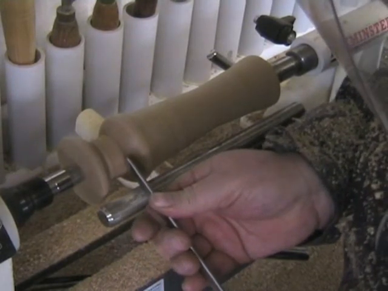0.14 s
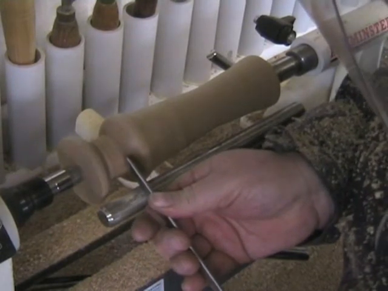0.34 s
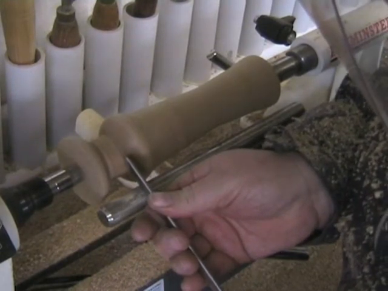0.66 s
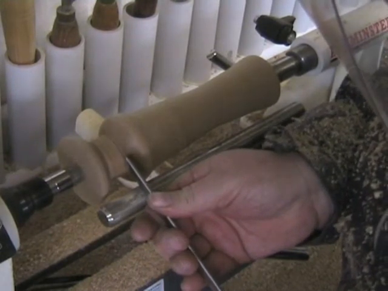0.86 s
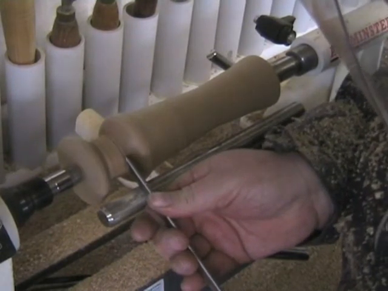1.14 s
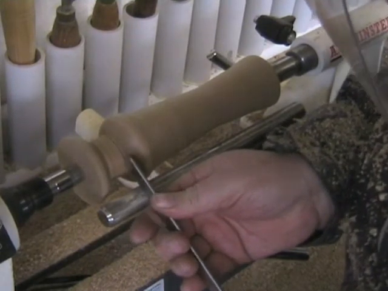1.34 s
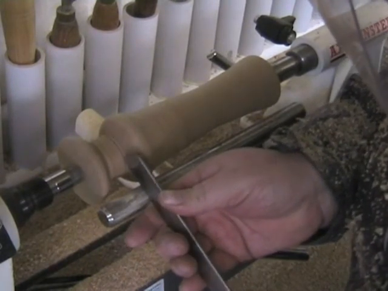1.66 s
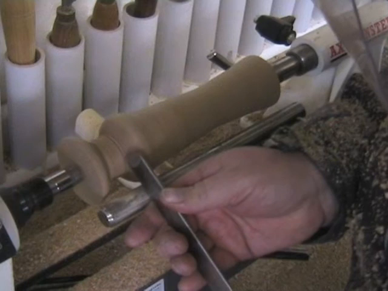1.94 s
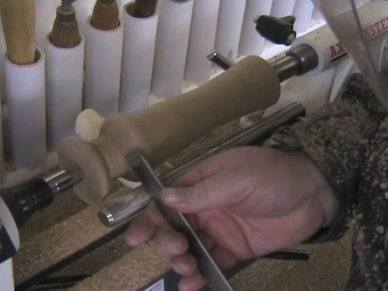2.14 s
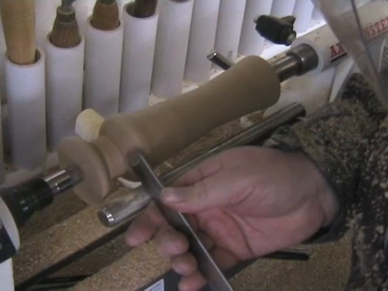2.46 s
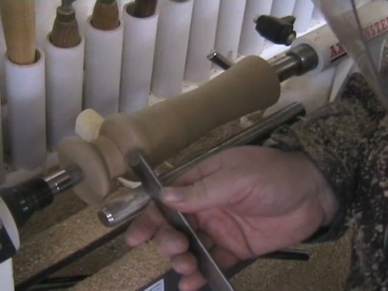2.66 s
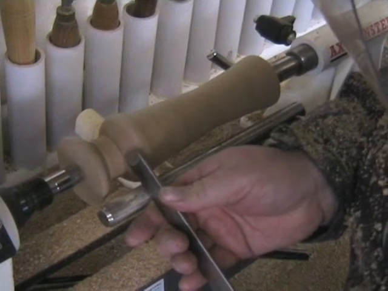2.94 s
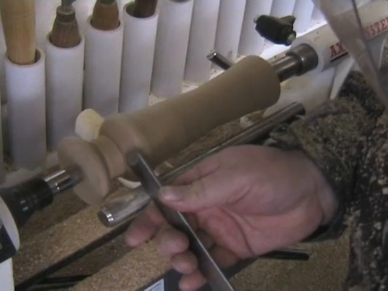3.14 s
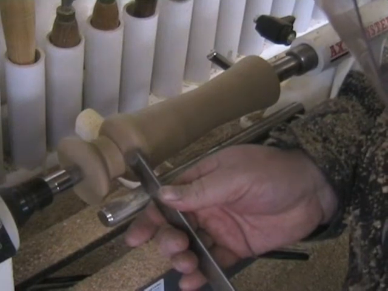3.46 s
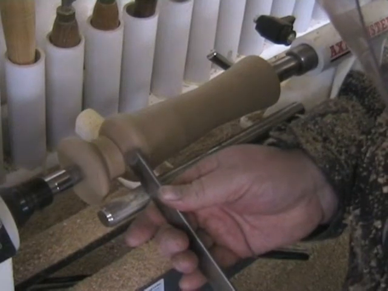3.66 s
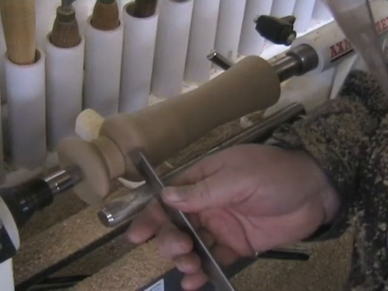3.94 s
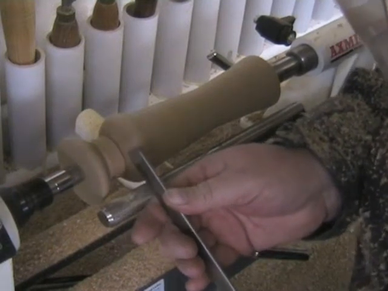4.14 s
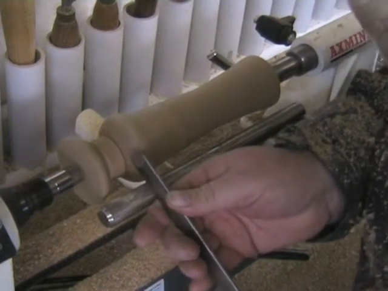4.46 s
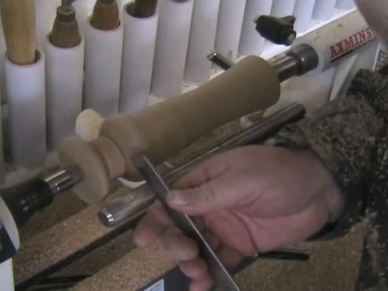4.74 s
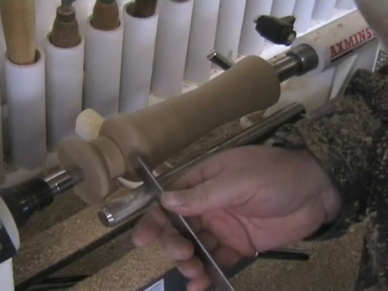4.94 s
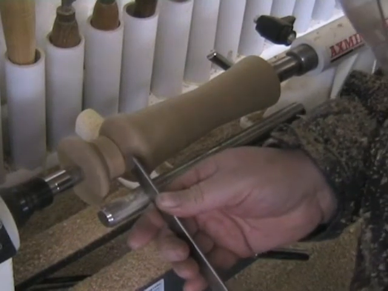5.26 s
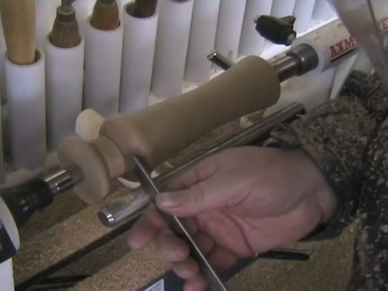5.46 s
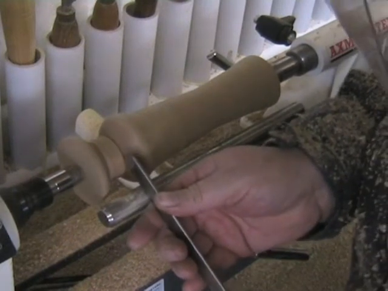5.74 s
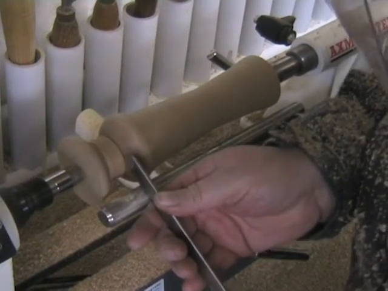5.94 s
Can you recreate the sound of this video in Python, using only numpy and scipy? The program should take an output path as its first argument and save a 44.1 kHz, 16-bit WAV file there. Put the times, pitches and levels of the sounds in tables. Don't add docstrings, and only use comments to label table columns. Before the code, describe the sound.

Steady motor whine and bearing rattle, overlaid by two harsh buzzing scrapes of blade on spinning wood, separated by one short hollow knock.

```python
import sys
import numpy as np
from scipy import signal
from scipy.fft import rfft, irfft, next_fast_len
from scipy.io import wavfile
from scipy.ndimage import uniform_filter1d, map_coordinates

SR = 44100
rng = np.random.default_rng(int(sys.argv[2]) if len(sys.argv) > 2 else 0)


def pcm_store(signal):
    levels = np.round(np.clip(np.atleast_2d(signal), -1, 1) * 32767)
    wavfile.write(sys.argv[1], SR, levels.astype(np.int16).T)


def undo_db(level):
    steps = np.asarray(level, float) / 20
    return 10 ** steps


N = 268569
T = np.arange(N) / SR
FIRST_PASS = T < 1.5
FFT_SIZE = next_fast_len(N)
HZ = np.fft.rfftfreq(FFT_SIZE, 1 / SR)

# time_s, turns_per_s
SPINDLE_SPEED = [(0, 45.75), (.25, 45.7), (.45, 45.88), (.55, 45.86), (.75, 45.68), (1.1, 45.68),
                 (1.24, 46.5), (2.55, 46.5), (3.0, 46.17), (3.45, 46.15), (3.7, 46.36), (3.85, 46.5),
                 (6.09, 46.5)]
BALLS, MOTOR, BELT = 5.8548, 1.0452, .2595


def level(x, db):
    return x * undo_db(db) / np.sqrt(np.mean(x ** 2))


def slope(points):
    hz, db = np.transpose(points)
    return undo_db(np.interp(np.log(HZ + 1), np.log(hz), db))


def rings(modes):
    return np.sqrt(sum(undo_db(2 * db) / (1 + (2 * (HZ - hz) / width) ** 2) for hz, width, db in modes))


def filtered(x, gain):
    return irfft(rfft(x, FFT_SIZE) * gain, FFT_SIZE)[..., :N]


def shape(x, gain):
    return level(filtered(x, gain), 0)


def walk(rate, size=64):
    hold = int(SR / rate / size)
    steps = np.repeat(rng.standard_normal(N // size // hold + 2), hold)
    slow = uniform_filter1d(uniform_filter1d(steps, hold), hold)
    return 1.4 * np.interp(np.arange(N) / size, np.arange(len(slow)), slow)


def tone(turns, multiple, wander):
    phase = 2j * np.pi * (multiple * turns + rng.random())
    return np.sqrt(2) * np.exp(phase + 1j * wander * walk(3.02))


def surface(turns, repeat, size=1024):
    fresh = rng.standard_normal((int(turns[-1]) + 2, size))
    rows = signal.lfilter([1], [1, -np.clip(repeat, 0, .95)], fresh, axis=0)
    return map_coordinates(rows.ravel(), [turns * size], order=3)


def into_pass():
    middle_s = [0.78, 3.06]
    return np.clip(T - np.where(FIRST_PASS, *middle_s), -.6, .7)


def mains_hum():
    # pitch_hz, level_db
    hums = [(100.1, -43.5), (120.1, -49.5)]
    return sum(tone(T, hz, 0.2).real * undo_db(db) for hz, db in hums)


def bed_rumble(turns):
    # pitch_hz, level_db per Hz
    bed_colour = [(45, -34), (130, -14), (168, -19.5), (185, -11), (420, -5.5), (550, -11), (1250, -20),
                  (3000, -12.5), (4200, -17.5), (6500, -20.5), (8100, -28.5), (9300, -26.5), (12250, -52),
                  (12500, -62)]
    # pitch_hz, width_hz, level_db
    bed_modes = [(232, 82, 6), (405, 55, 3), (475, 25, 2.5), (890, 320, 3), (1695, 420, 7), (2450, 115, 8),
                 (2950, 110, 2)]
    throb = 1 + 0.17 * np.cos(2 * np.pi * MOTOR * turns) + 0.081 * np.cos(4 * np.pi * BALLS * turns)
    bass = 1 / (1 + (HZ / 3200) ** 6)
    idle_speed = SPINDLE_SPEED[-1][1]
    alike = 1 + .4 * (1 - bass) * np.cos(2 * np.pi * (HZ / idle_speed + 0.39) / BALLS)
    colour = slope(bed_colour) * np.hypot(1, rings(bed_modes)) * alike
    noise = rng.standard_normal(N)
    hiss = filtered(noise, 1 - bass) * throb + filtered(noise, bass)
    return undo_db(-24.5) * shape(hiss, colour)


def unbalance(turns):
    throbs = [(1, -52, .0), (MOTOR, -49, .817)]
    return sum(np.sqrt(2) * undo_db(db) * np.cos(2 * np.pi * (k * turns + start)) for k, db, start in throbs)


def shaft_tones(turns):
    parts = [(2, -46.5), (4, -36.5), (4.449, -41), (5, -38), (8.31, -34.5), (8.85, -40.5), (9, -42),
             (10, -40), (12.46, -41), (13.267, -47), (20.755, -47.5), (30.957, -45.5), (41.503, -40),
             (49.806, -44.5)]
    return sum((tone(turns, k, 0.71) * undo_db(db + 2.0 * walk(4.01))).real for k, db in parts)


def rotor_tones(turns, belt):
    whines = [(3.976, -39, -73), (7.945, -41.5, -51), (13.81, -49.5, -73), (16.04, -34.5, -72),
              (24, -50, -73), (27.7, -68, -63), (32.3, -37, -47)]
    return sum((tone(turns, k * MOTOR, 0.16) * (undo_db(db) + 2 * undo_db(sway) * belt)).real
               for k, db, sway in whines)


def bearing_clicks(turns, belt, press):
    clicks = [(1, -69, -44.5, -32.5, -65, -72), (2, -53, -48.5, -56.5, -52, -49.5),
              (3, -50, -60, -65, -63, -51), (4, -43, -49.5, -79, -55, -50), (5, -48.5, -71, -59, -70, -76),
              (6, -30, -40.5, -49, -39.5, -40), (7, -44.5, -45.5, -56, -68, -50),
              (8, -37, -42.5, -63, -52, -49.5), (9, -36.5, -54, -45, -59, -43),
              (10, -48.5, -80, -41.5, -62, -69), (11, -60, -41, -67, -42, -61),
              (12, -50, -45.5, -51, -56, -49), (13, -46.5, -72, -56, -72, -71.5)]
    # time_s, level_db
    settling = [(0, -4.5), (1.2, -9), (2.9, -4.5), (3.3, 1.5), (6.09, 0.5)]
    settle_db = np.interp(T, *np.transpose(settling))
    spin = np.exp(2j * np.pi * turns)
    out = 0
    for k, db, low, high, low2, sway in clicks:
        swing = undo_db(db) + undo_db(low) / spin + undo_db(high + (k == 1) * settle_db) * spin
        swing = swing + undo_db(low2) / spin ** 2 + 2j * undo_db(sway) * belt
        out = out + tone(turns, k * BALLS, 0.15) * swing * press
    swing = .45 + 1 / spin + .4 * spin
    count = len(clicks)
    for k in range(count + 1, 2 * count):
        shaken = tone(turns, k * BALLS, .3) * np.exp(.09j * k * belt)
        out = out + shaken * swing * undo_db(-51.5 - .4 * (k - count))
    return out.real


def lathe(turns, press):
    belt = np.cos(2 * np.pi * BELT * turns)
    still = mains_hum() + bed_rumble(turns)
    turning = unbalance(turns) + shaft_tones(turns) + rotor_tones(turns, belt)
    return still + turning + bearing_clicks(turns, belt, press)


def tap():
    after = T - 1.911
    blow = np.exp(-np.abs(after) / np.where(after < 0, .003, .018))
    wood_modes = [(810, 150, 4), (1010, 120, -4)]  # pitch_hz, width_hz, level_db
    return undo_db(-16.5) * blow * shape(rng.standard_normal(N), rings(wood_modes) ** 2)


def contact():
    # time_s, push_db of the edge, load_db on the wood
    strokes = [
        [(0.0, -20.5, -19.5), (0.016, -21.5, -23), (0.12, -21.5, -17), (0.364, -26, -17.5), (0.624, -22, -18.5),
         (1.094, -23, -18.5), (1.176, -26, -22), (1.192, -37, -28), (1.215, -47, -30)],
        [(2.2, -44, -36), (2.232, -40, -40), (2.538, -25, -24.5), (2.674, -21, -17), (3.508, -23, -24),
         (3.66, -22, -20.5), (3.698, -30, -34), (3.71, -39, -27), (3.72, -45, -37)],
    ]
    # start_s, length_s, push_db, load_db
    brushes = [
        (1.859, 0.065, -31.5, -22),
        (6.063, .03, -32, -32),
    ]
    # db_per_db of drive, first_pass_db, second_pass_db,
    # first_drift_db_per_s, second_drift_db_per_s
    responses = [(1.27, 5, 2, -1, -3), (0.93, 2.5, -0.5, -5.5, -0.5), (1.24, 1.2, 0.6, 4.5, 1),
                 (0.91, -3.5, -0.7, -1.5, 1.5)]
    full_db = [-22, -17]
    attack_s, release_s, fade_db = .012, .025, 5
    drive = np.full((2, N), 1e-9)
    for s, *dbs in map(np.transpose, strokes):
        since = T - s[0] + .02 * (s[0] < .05)
        edge = np.clip(np.minimum(since, s[-1] + .02 - T) / .02, 0, 1)
        drive = drive + edge * undo_db(np.array([np.interp(T, s, db) for db in dbs]))
    for start, length, *dbs in brushes:
        edge = np.clip(np.minimum((T - start) / attack_s, 1 + (start + length - T) / release_s), 0, 1)
        drive = drive + edge * undo_db(np.c_[dbs] - fade_db * np.clip((T - start) / length, 0, 2))
    push, load = drive / undo_db(np.c_[full_db])
    gains = []
    for x, (power, one_db, two_db, drift1, drift2) in zip((push, load, load, push), responses):
        db = np.where(FIRST_PASS, one_db + drift1 * into_pass(), two_db + drift2 * into_pass())
        gains.append(undo_db(full_db[0] + db) * x ** power)
    return np.array(gains)


def ridge_knock(turns):
    wood_ridges = [(4.026, -16, -21, -1), (5.008, -4, -8, -7), (5.99, -6, -12, -3), (6.995, -7.5, -15, 10),
                   (9.057, -1.5, -5, 6), (10.01, -12.5, -1, 5), (13.01, 0, -9, 13), (17.02, -3, -8, 2),
                   (18.02, 1.5, -2.5, 6), (19.97, -9, -4, 6), (21.03, -5.5, -9.5, -10),
                   (22.01, -8.5, 0.8, -1.5), (23.05, -7.5, -1.2, 11), (25, -26, -9, -15),
                   (27, -18, -12, -16), (32.08, 0, 0.5, 9), (35.08, -4.3, 1.8, -17)]
    grown_s = np.clip(into_pass(), -.3, .3)
    ridge_db = {int(k): np.where(FIRST_PASS, one, two) + growth * grown_s
                for k, one, two, growth in wood_ridges}
    others_db = np.where(FIRST_PASS, -12, -11.5)
    knock = 0
    for k in range(1, 39):
        db = ridge_db.get(k, -29 if k < min(ridge_db) else others_db)
        sway_db = 2.2 if k in ridge_db else 3.5
        knock = knock + tone(turns, k, 0.67).real * undo_db(db + sway_db * walk(4.84))
    return level(knock, 3.4)


def pass_ring(x, modes, under, over):
    modes = np.array(modes)
    one, two = (shape(x, over * np.hypot(under, rings(modes[:, [0, 1, c]]))) for c in (2, 3))
    return np.where(FIRST_PASS, one, two)


def steadied(x):
    return x / uniform_filter1d(x ** 2, SR // 30) ** .4


def cutting(turns, gains):
    # pitch_hz, level_db per Hz
    scrape_colour = [(150, -41), (500, -11.5), (1500, -3), (2500, -2), (3600, -2), (4500, -7), (6200, -5),
                     (7500, -11.5), (9000, -14.5), (11000, -27), (12600, -53), (14400, -36), (15200, -42)]
    # pitch_hz, width_hz, first_pass_db, second_pass_db
    wood_modes = [(1577, 32, 10, 8), (2260, 180, -2, -20), (2820, 120, 6, -7), (2960, 160, 8.5, 4),
                  (3020, 60, 7, -24), (3420, 190, -9, -10), (3740, 110, -14, -12)]
    blade_modes = [(3890, 107, 7.5, 11.7), (4330, 23, -4.5, 2.3), (4650, 65, 8.3, 3.7),
                   (5270, 230, 3.5, 8.1), (5540, 140, 3, 10.7), (5830, 37, 12, 3)]
    tip_modes = [(6610, 140, -1.5, 2), (7050, 130, -5, -2.5), (8000, 280, -6.5, -4),
                 (8620, 230, -13.5, -11), (9720, 130, -12, -18), (11080, 110, -17, -16),
                 (13500, 230, -36, -20)]
    bite = undo_db(0.85 * level(surface(turns, 0.96, size=10), 0) + 0.26 * walk(20.))
    fibres, ridges, dust = (surface(turns, repeat) * bite for repeat in (.45, .7, .4))
    scrape = pass_ring(fibres, blade_modes, 1, slope(scrape_colour))
    wood = steadied(pass_ring(ridges, wood_modes, 0, 1))
    tip = steadied(pass_ring(dust, tip_modes, 0, 1))
    tip = tip * (1 + 0.15 * np.cos(2 * np.pi * (turns + 0.24)))
    body = gains[1] * ridge_knock(turns) + gains[2] * undo_db(3.0) * wood
    return gains[0] * scrape + body + gains[3] * undo_db(0.5) * tip


def room(sound):
    tail_s = np.arange(SR // 4) / SR
    tails = rng.standard_normal((2, len(tail_s))) * undo_db(-60 * tail_s / .3)
    wall_colour = slope([(110, -11), (200, -0.5), (1500, -7.0), (3000, -12.0), (10000, 7.0)])
    walls = rfft(level(tails, -11.5) / np.sqrt(len(tail_s)), FFT_SIZE) * wall_colour
    lag = 2 * np.pi * 1.32 * HZ / SR + 0.93 / (1 + (HZ / 130) ** 3)
    direct = np.exp(-1j * np.outer([1, 0], lag)) * undo_db([[.15], [-.15]])
    return filtered(sound, direct + walls)


def scene():
    turns = np.cumsum(np.interp(T, *np.transpose(SPINDLE_SPEED))) / SR
    gains = contact()
    press = 1 + undo_db(9.5) * uniform_filter1d(gains[2], SR // 20)
    return room(lathe(turns, press) + tap() + cutting(turns, gains))


def top_cut(x):
    return signal.sosfilt(signal.butter(12, 14900, fs=SR, output="sos"), x)


def record(dry):
    heard = uniform_filter1d(np.mean(dry ** 2, axis=0), SR // 4)
    gain = np.minimum(1, (undo_db(-37.5) / heard) ** 0.19)
    whine_db = -50 + np.array([[-2.2], [-5]])
    whine_phase = 2 * np.pi * 12221.9 * T + np.array([[0], [2.3]])
    whine = np.sqrt(2) * undo_db(whine_db) * np.sin(whine_phase)
    offset = .0077
    return top_cut(dry * gain + whine * gain ** 2 + offset)


dry = scene()
out = record(dry)
pcm_store(out)
```